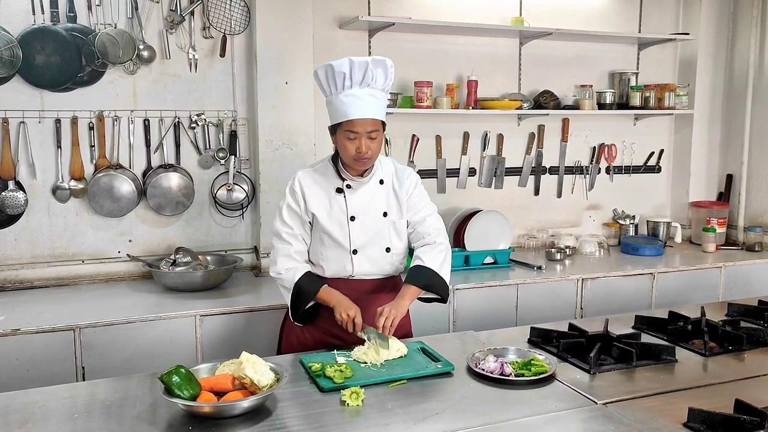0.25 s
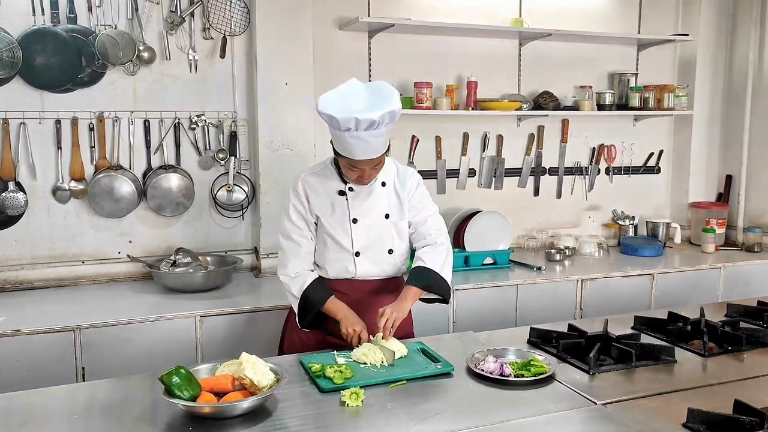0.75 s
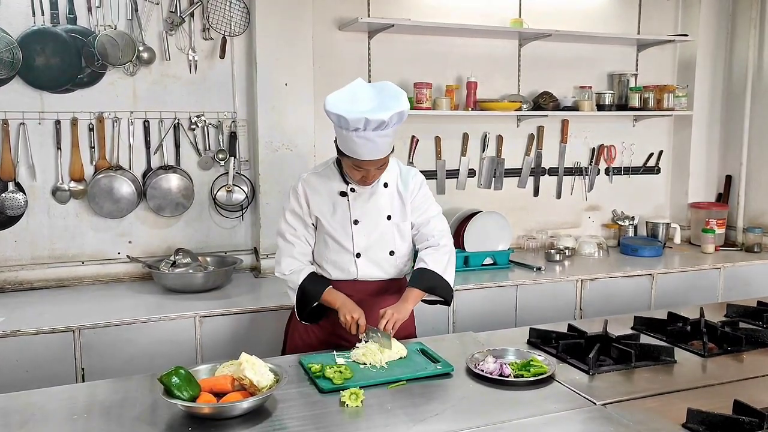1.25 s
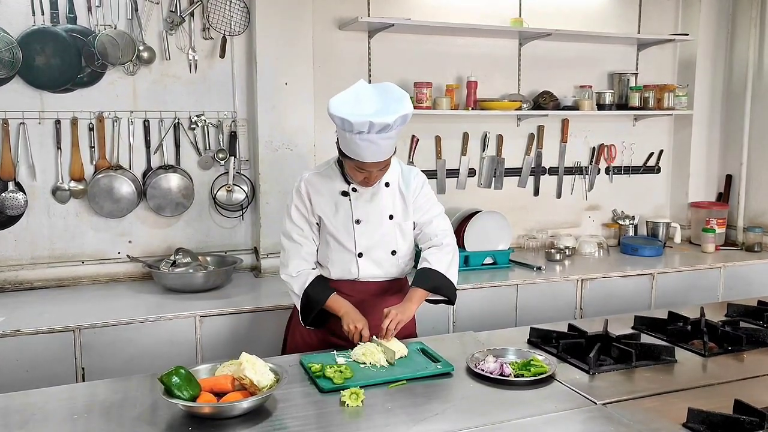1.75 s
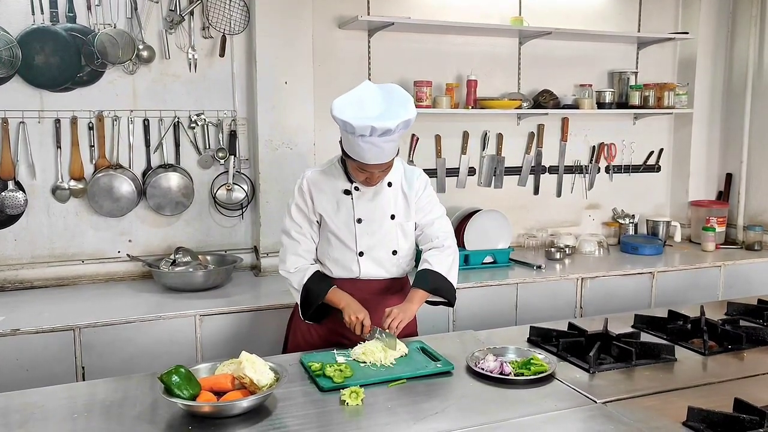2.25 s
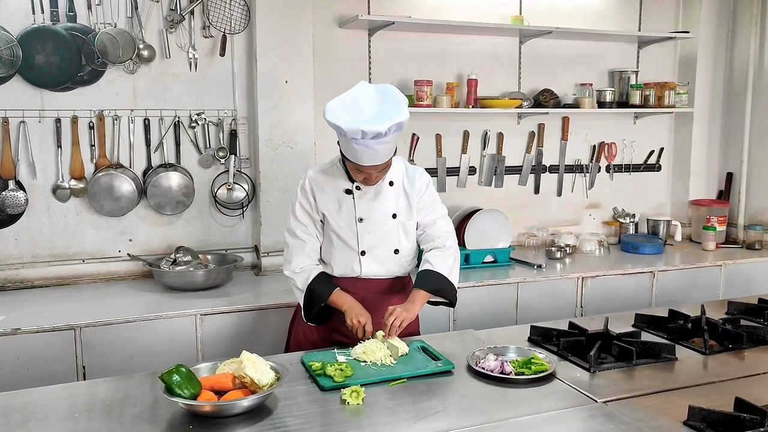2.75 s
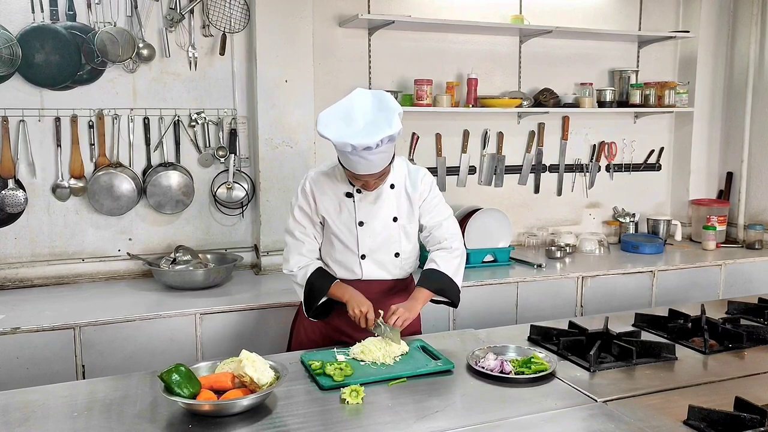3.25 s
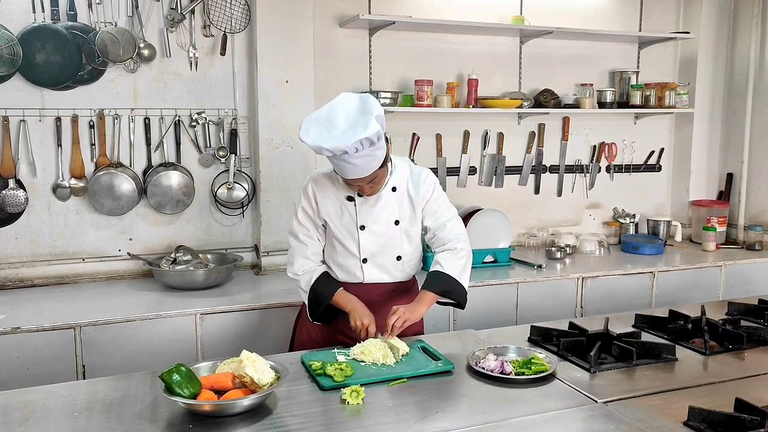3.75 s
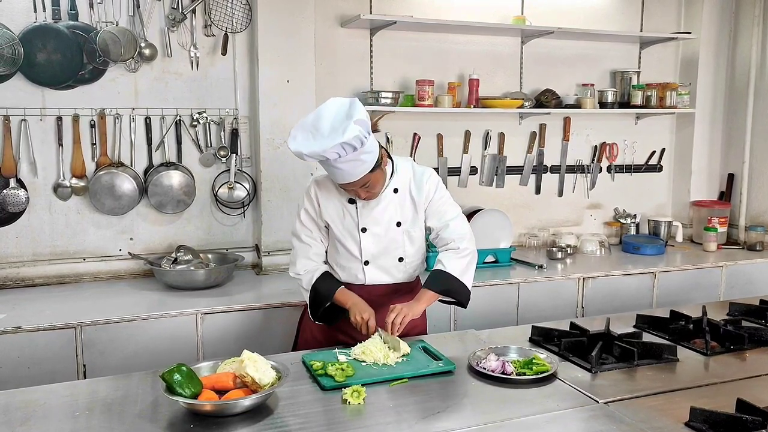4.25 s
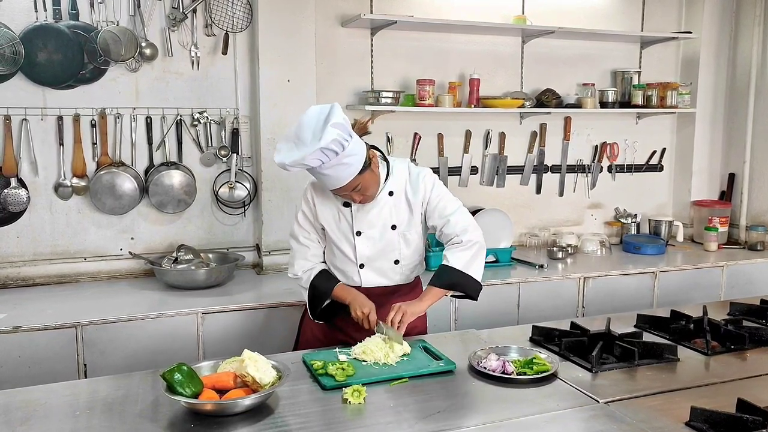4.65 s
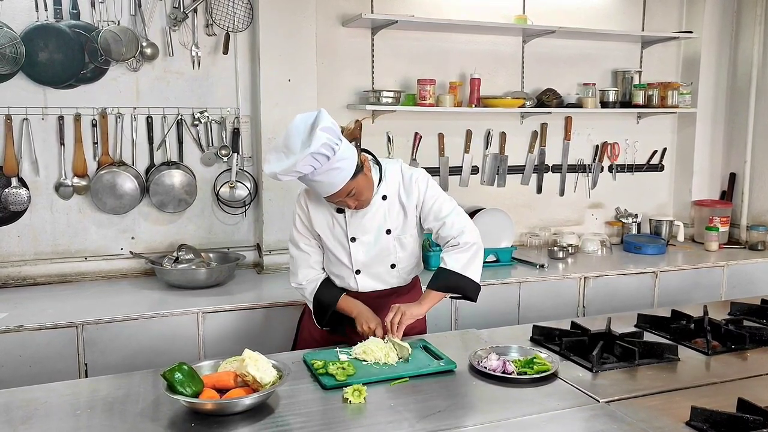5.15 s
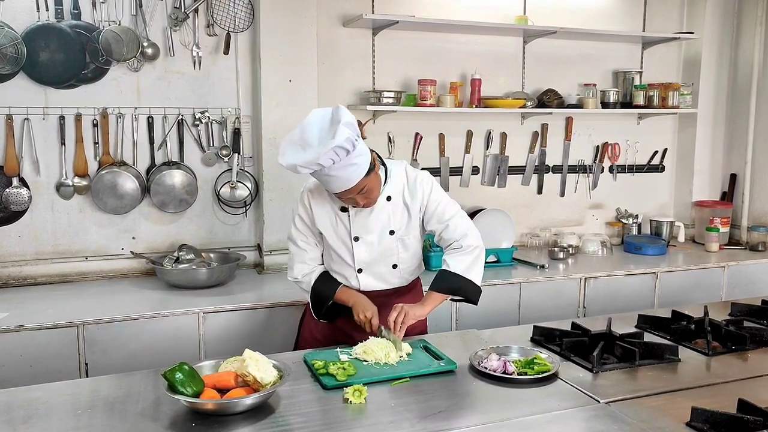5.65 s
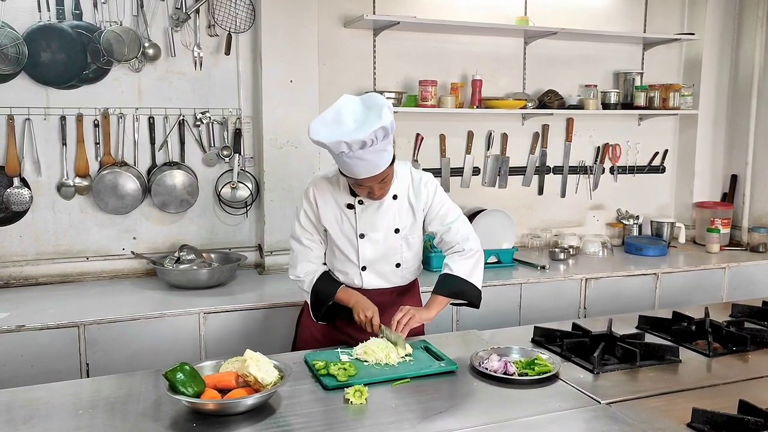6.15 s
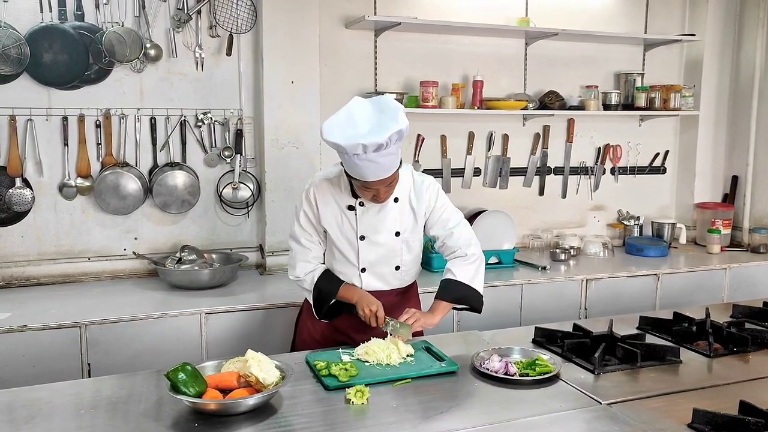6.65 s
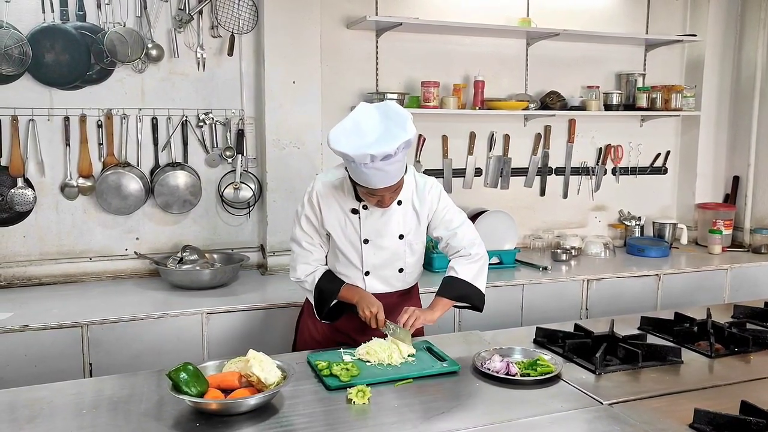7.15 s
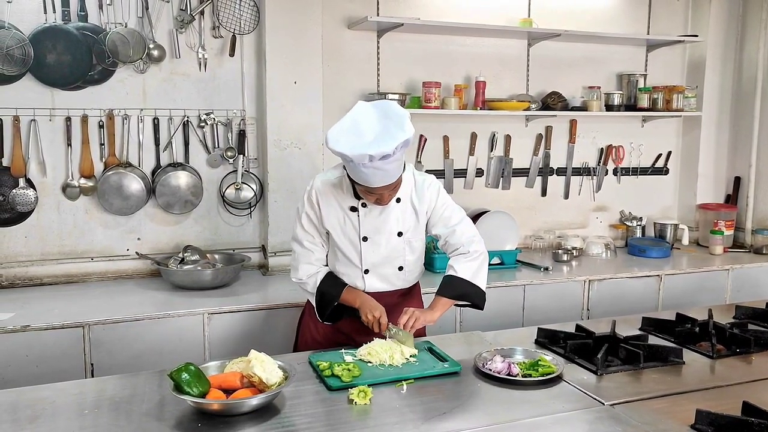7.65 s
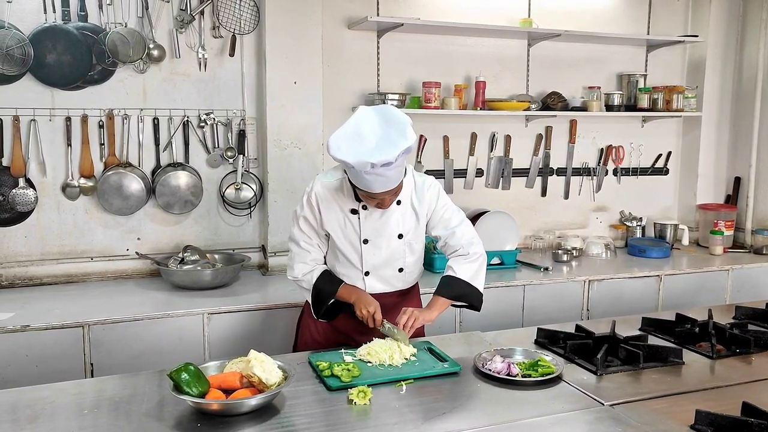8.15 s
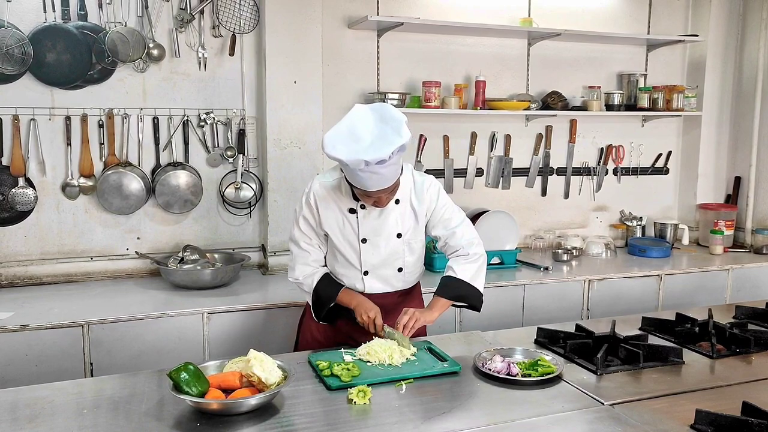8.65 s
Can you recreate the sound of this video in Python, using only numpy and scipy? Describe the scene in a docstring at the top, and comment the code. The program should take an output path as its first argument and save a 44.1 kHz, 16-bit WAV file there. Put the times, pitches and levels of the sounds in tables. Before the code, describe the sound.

In a reverberant kitchen with a low steady rumble, a knife crunches through cabbage and knocks on a plastic board in a quick, even rhythm. The knocks vary in strength and set a steel counter ringing faintly. After about six seconds the strokes thin out and a deep drone swells briefly. Single leaves snap, then a few last, widely spaced cuts land amid softly rustling shreds.

```python
"""Over a low steady rumble, a cook shreds cabbage on a plastic board that lies on a steel counter.
In each stroke the top leaf snaps, then cells burst in a swelling crunch as the knife sinks through.
Most strokes end in a short knock on the board; the counter rings faintly and the hard-walled kitchen
reverberates. After six seconds the strokes thin out and a deep drone swells for a moment; single
leaves snap, and a few last cuts follow amid the faint rustle of shreds."""
import sys
import numpy as np
from scipy import signal
from scipy.fft import rfft, irfft, next_fast_len
from scipy.io import wavfile
from scipy.ndimage import map_coordinates

SR = 44100
rng = np.random.default_rng(int(sys.argv[2]) if len(sys.argv) > 2 else 0)


def master(y):
    """Save y as 16-bit WAV."""
    cut = np.clip(np.atleast_2d(y).T, -1, 1)
    pcm = np.round(cut * 32767)  # scale
    wavfile.write(sys.argv[1], SR, pcm.astype(np.int16))


N = 392931


def amp(db):
    """Amplitude ratio of a level in decibels."""
    return 10 ** (np.asarray(db) / 20)


def unit(x):
    """Normalisation to rms 1."""
    return x / np.sqrt(np.mean(x ** 2) + 1e-20)


def along(points, hz):
    """Interpolation of (f/Hz, value) points on a logarithmic frequency axis."""
    f, values = np.transpose(points)
    return np.interp(np.log(hz + 1), np.log(f + 1), values)


def curve(rows):
    """Linear interpolation of (t/s, value) rows at every sample."""
    return np.interp(np.arange(N) / SR, *np.transpose(rows))


def filtered(x, response):
    """Linear filtering: the spectrum of x times a complex frequency response."""
    n = x.shape[-1]
    padded = next_fast_len(n + 8192)
    hz = np.fft.rfftfreq(padded, 1 / SR)
    return irfft(rfft(x, padded) * response(hz), padded)[..., :n]


def coloured(x, spectrum):
    """Spectral shaping by (f/Hz, level/dB) points, normalised to rms 1."""
    return unit(filtered(x, lambda hz: amp(along(spectrum, hz))))


def resonance(f, hz, width):
    """Frequency response of a damped harmonic oscillator."""
    return 1j * f * width / (hz * hz - f * f + 1j * f * width)


def add(track, s, sound):
    """Superposition: a sound joins the track at s seconds, which may be negative."""
    start = round(s * SR)
    part = sound[..., max(-start, 0):max(N - start, 0)]
    track[..., max(start, 0):][..., :part.shape[-1]] += part


# spectral density of the room noise: f/Hz, level/dB
AIR_SPECTRUM = [(12, -14), (24, 7), (45, -4), (85, -6), (110, -12), (190, -11.5), (300, -24.5),
                (500, -24.5), (1000, -32), (2000, -38), (4000, -45), (8000, -54.5), (14500, -61)]
# envelope of the drone: t/s, level/dB
DRONE_ENVELOPE = [(6.1, -60), (6.5, -40), (7.1, -50), (7.5, -43), (7.8, -59)]

def background(air_db=-48, drone_hz=43, drone_width_hz=15, hiss_side_db=-89):
    """Broadband noise gives a steady rumble and hiss, narrowband noise a drone that comes and goes."""
    air = amp(air_db) * coloured(rng.standard_normal(N), AIR_SPECTRUM)
    drone = unit(filtered(rng.standard_normal(N), lambda f: resonance(f, drone_hz, drone_width_hz) ** 2))
    side = amp(hiss_side_db) * unit(filtered(rng.standard_normal(N), lambda f: f > 5000))
    return air + amp(curve(DRONE_ENVELOPE)) * drone + np.array([side, -side])


# reverberation time of the kitchen: f/Hz, T60/s
REVERB_TIME = [(150, 1.5), (450, 1.01), (1000, 0.82), (2500, 0.6447), (5000, 0.55), (9000, 0.38),
               (14000, 0.3)]
# colour of the reverberant field: f/Hz, level/dB
REVERB_SPECTRUM = [(100, 11.5), (270, -3.5), (420, 8), (600, -2.5), (800, -4), (1200, -5.5), (2200, -2),
                   (5000, -1), (14000, -1)]

def kitchen(x, wet_db):
    """Diffuse field added to the direct sound: each band stores energy, which decays exponentially."""
    hz, t, bands = signal.stft(x, SR, nperseg=256)
    retained = amp(-120 * t[1] / along(REVERB_TIME, hz))  # share of energy left after one frame
    energy = np.array([signal.lfilter([0, (1 - k) / 2, (1 - k) / 2], [1, -k], abs(band) ** 2)
                       for k, band in zip(retained, bands)])
    noise = signal.stft(rng.standard_normal((2, len(x))), SR, nperseg=256)[2]
    field = noise / noise.std() * np.sqrt(energy) * amp(wet_db + along(REVERB_SPECTRUM, hz))[:, None]
    field[1] *= np.interp(hz, [3700, 5600], [0, .88])[:, None]  # only the treble is wide
    mid, side = signal.istft(field, SR, nperseg=256)[1][:, :len(x)]
    return x + np.array([mid + side, mid - side])


def near_walls(x, echo_db=-23.0, count=9):
    """Early reflections: worktop, stove and the cook's body return weak, delayed copies."""
    delay_s = rng.uniform(.003, .033, count)
    sign = rng.choice([-1, 1], count)
    return filtered(x, lambda f: 1 + amp(echo_db) * sign @ np.exp(-2j * np.pi * np.outer(delay_s, f)))


def crackle(size, rate, spread_db):
    """Poisson process: cells burst independently, rate times a second, in clicks of unequal size."""
    bursts = rng.random(size) < rate / SR
    pulse, strength = rng.standard_normal((2, size))
    return bursts * pulse * amp(spread_db * np.clip(strength, -2, 2))


# spectral density of tearing cells: f/Hz, level/dB
TEAR_SPECTRUM = [(300, -29.5), (1000, 9), (1900, 5), (3000, 10.5), (5000, 13.5), (7000, 7.5), (9000, 5.5),
                 (12000, 6), (14500, 0)]
# points at which leaves vary in colour: f/Hz
LEAF_BANDS = [1500, 2200, 3200, 4500, 6000, 7500, 9500, 12000, 14500]

def leaf(x, vary_db=1):
    """Source and filter: tearing cells sound through a leaf, each leaf with a colour of its own."""
    own_colour = np.column_stack([LEAF_BANDS, vary_db * rng.standard_normal(len(LEAF_BANDS))])
    return coloured(coloured(x, TEAR_SPECTRUM), own_colour)


# envelope of the rustle as the fingers rest, then gather the shreds: t/s, level/dB
RUSTLE_ENVELOPE = [(6.8, -1), (7.1, -20.5), (7.7, 0), (8.2, 0.5), (8.7, -1)]

def shreds(rustle_db=-83):
    """Noise modulated by random pulses: loose shreds shift under the fingers in faint ticks."""
    t = np.arange(SR // 20) / SR
    slips = abs(crackle(N, rate=40, spread_db=1.5))
    stirring = signal.fftconvolve(slips, np.exp(-t / .004))[:N]
    rustle = unit(stirring * coloured(rng.standard_normal(N), TEAR_SPECTRUM))
    return kitchen(amp(rustle_db + curve(RUSTLE_ENVELOPE)) * rustle, wet_db=-1)


# lightly damped modes of the counter, the lowest a dull shudder: f/Hz, level/dB, T60/s
COUNTER_MODES = [(52, 11, .45), (186, 0, .9), (382, 2, .7), (430, -1, .65), (504, 0.5, .8), (648, -9, .7),
                 (813, -12, .8), (930, -10, .6), (1916, -12, .55)]

def counter(knock, ring_db=-56):
    """Free vibration: the steel top rings on after a knock, a little differently for each spot."""
    t = np.arange(SR) / SR
    hz, db, t60 = np.transpose(COUNTER_MODES)[:, :, None]
    strength = amp(ring_db + db + 2 * rng.standard_normal(hz.shape))
    modes = strength * amp(-60 * t / t60) * np.sin(2 * np.pi * (hz * t + rng.random(hz.shape)))
    return signal.fftconvolve(knock, modes.sum(0))


def bending(force, top_hz=3900):
    """Dispersion: bending waves carry treble ahead of bass; the soft plastic absorbs the highest."""
    dispersed = filtered(force, lambda f: (1j * f - 2600) / (1j * f + 2600))  # all-pass
    absorption = signal.butter(4, top_hz, fs=SR, output="sos")
    return signal.sosfilt(absorption, dispersed)


# heavily damped modes of the board and the knife on it: f/Hz, bandwidth/Hz, level/dB
BOARD_MODES = [(475, 101.7, -10), (690.6, 182, 8), (902, 180, 0.6), (1248, 207, 1.5), (1550, 305, -1),
               (1880, 320, -9.5), (2070, 58, -11.5), (3135, 830, -18)]

def board(force, clack_db=0, spot_db=0.5, notch_hz=2990, notch_width_hz=220):
    """Modal superposition: the board's modes answer a force and cancel at one antiresonance."""
    upper = np.transpose(BOARD_MODES)[0] > 1000
    gains = amp(spot_db * rng.standard_normal(len(BOARD_MODES)) + clack_db * upper)
    modes = lambda f: sum(gain * amp(db) * resonance(f, hz, width)
                          for gain, (hz, width, db) in zip(gains, BOARD_MODES))
    return filtered(force, lambda f: modes(f) * (1 - resonance(f, notch_hz, notch_width_hz)))


# leaves and ribs bent until they break: t/s, snap level/dB, level of the board's jolt/dB
LEAF_BREAKS = [(0.684, -48.5, -37), (1.295, -49, -25), (1.6794, -41, -18), (2.9194, -54, -22.5),
               (3.3089, -53, -30.5), (4.811, -48, -20.5), (5.5018, -49, -5.5), (6.2871, -51.5, -26),
               (6.342, -43.5, -33), (6.3649, -44.5, -21.5), (6.7415, -48.5, -31.5), (6.797, -39.5, -26.5),
               (7.3552, -53, -29)]

def snaps(snap_db=-7, top_leaf_db=-4):
    """Brittle fracture: a leaf breaks in one burst as each stroke begins, and now and then between."""
    out, t = np.zeros(N), np.arange(SR // 20) / SR
    burst = lambda: leaf(crackle(len(t), rate=9000, spread_db=3)) * np.exp(-t / .004)
    for landing, length, crunch_db, _, _ in KNIFE_STROKES:
        add(out, landing - length, amp(crunch_db + top_leaf_db + snap_db) * burst())
    for s, db, jolt_db in LEAF_BREAKS:
        snap = amp(db + snap_db) * burst()
        jolt = board(bending(amp(jolt_db) * (t == 0)))
        add(out, s, snap + jolt)
    return kitchen(out, wet_db=-1)


# share of thick, juicy ribs under the blade: t/s, level/dB
RIB_SHARE = [(0.8, 1), (2, 4.5), (3.5, 11), (4.5, 11), (5.5, 11), (6.5, 8.5), (8.8, 9)]

def crunch(crisp_db=-2, rib_db=2, swell_db=4.5, layer_hz=160, layer_db=3, bite_s=0.012, release_s=0.0109):
    """Progressive fracture: layer after layer tears until the blade lands; deep ribs shake the board."""
    out, t = np.zeros(N), np.arange(SR // 4) / SR
    for landing, length, crunch_db, _, _ in KNIFE_STROKES:
        depth = np.clip(t / length, 0, 1)
        layers = layer_db * map_coordinates(rng.standard_normal(256), [t * layer_hz], mode="wrap")
        force = amp(crunch_db - swell_db * (1 - depth) + layers)
        force *= np.minimum(t / bite_s, 1) * np.exp(-np.maximum(t - length, 0) / release_s)
        thick_db = np.interp(landing, *np.transpose(RIB_SHARE))
        crisp = amp(crisp_db) * leaf(crackle(len(t), rate=2600, spread_db=3))
        ribs = amp(rib_db + thick_db) * depth * unit(board(crackle(len(t), rate=3000, spread_db=1.5)))
        add(out, landing - length, force * (crisp + ribs))
    return kitchen(out, wet_db=-1)


# the blade moves along the board: t/s, level of the upper board modes/dB, level of the counter/dB
STRIKE_SPOTS = [(1.1, -0.5, -0.5), (3.0, 0.2, 0), (3.6, 2.4, -2), (7.5, 1.9, -0.5), (8.4, 2.5, -5)]
# the blade sinks through the leaves and lands, most faintly on a bed of shreds:
# landing t/s, time in the leaves/s, crunch level/dB, blow level/dB, contact time/ms
KNIFE_STROKES = [(-0.08, .05, -56, 17, 0.34), (0.1791, 0.055, -55, 15, 0.33),
                 (0.524, 0.13, -54.5, -2.5, 1.8), (0.817, 0.11, -52, 4.5, 0.78),
                 (1.1159, 0.1, -53, 18.5, 0.31), (1.457, 0.16, -53.5, -14, 1),
                 (1.742, 0.082, -54, 14, 0.58), (2.0844, .11, -54, 3, 0.49), (2.4147, 0.12, -54, 3.5, 1.13),
                 (2.7407, 0.12, -55, 9.5, 0.62), (3.037, 0.079, -56, 15.5, 0.37),
                 (3.4795, 0.12, -58.5, 16, 0.24), (3.8577, 0.13, -63, 19, 0.31),
                 (4.2172, 0.14, -59.5, 5, 0.99), (4.546, 0.13, -59, 1.5, 0.88),
                 (4.845, 0.05, -61.5, 15, 0.51), (5.2232, 0.15, -58.5, 7, 1.03),
                 (5.525, 0.12, -54.5, 8, 0.72), (5.7727, 0.038, -58.5, 11, 0.65),
                 (6.0714, 0.078, -64, 17, 0.53), (6.4535, 0.086, -57, 18, 0.25),
                 (7.4523, 0.11, -55, 16.5, 0.31), (7.812, 0.12, -55, -4.5, 1),
                 (8.4112, 0.062, -61.5, 13.5, 0.67), (8.8537, 0.057, -70, 11, 0.52)]

def chops(tick_db=-46, tick_t60=0.035, clean_ms=0.67):
    """Contact time sets bandwidth: a blow cushioned by leaves is dull, a clean one bright with a tick."""
    out, t = np.zeros((2, N)), np.arange(SR // 20) / SR
    spot_s, clack_db, ring_db = np.transpose(STRIKE_SPOTS)
    for s, _, _, blow_db, contact_ms in KNIFE_STROKES:
        push = np.sin(np.pi * np.minimum(1000 * t / contact_ms, 1)) ** 2
        force = amp(blow_db) * push / push.sum()
        knock = board(bending(force), np.interp(s, spot_s, clack_db))
        tick = coloured(rng.standard_normal(len(t)), TEAR_SPECTRUM) * amp(-60 * t / tick_t60)
        tick *= amp(blow_db + tick_db) * clean_ms / contact_ms / np.linalg.norm(tick)
        impact = np.pad(near_walls(knock + tick), (len(t), SR))  # space for the reverberation
        add(out, s - len(t) / SR, kitchen(impact, wet_db=-4.5))
        add(out, s, counter(knock * amp(np.interp(s, spot_s, ring_db))))
    return out


def scene():
    """Superposition of knocks, crunch, leaf noises and background, in stereo."""
    return chops() + crunch() + snaps() + shreds() + background()


def record(dry, ceiling=.95, top_hz=14600):
    """Soft saturation rounds the highest peaks; a steep low-pass limits the bandwidth."""
    rounded = dry / (1 + (dry / ceiling) ** 6) ** (1 / 6)
    return filtered(rounded, lambda hz: 1 / np.sqrt(1 + (hz / top_hz) ** 160))


dry = scene()
out = record(dry)
master(out)
```